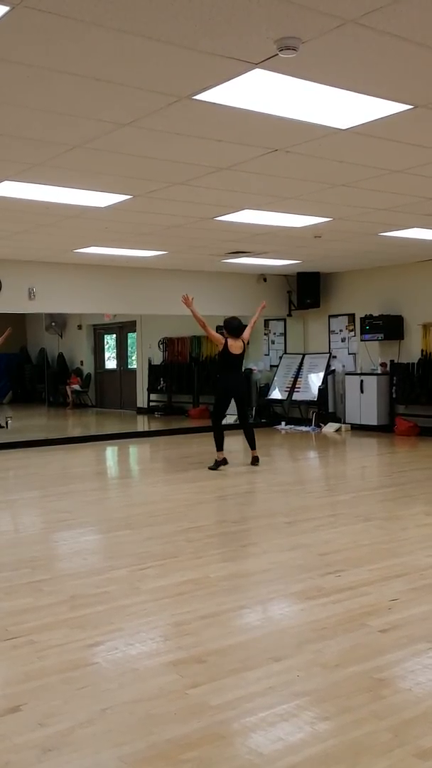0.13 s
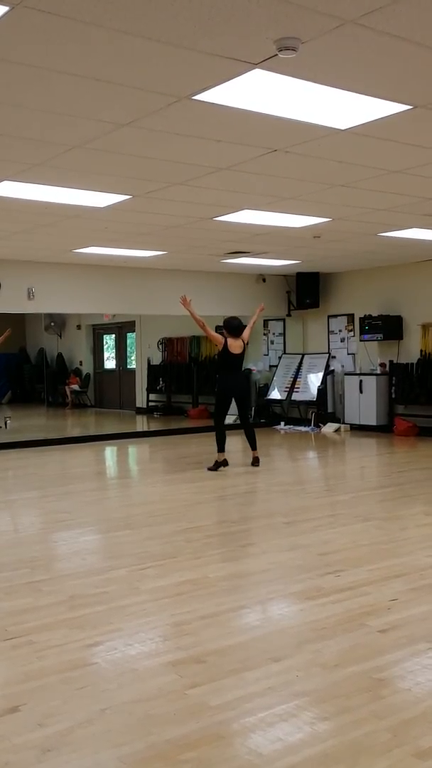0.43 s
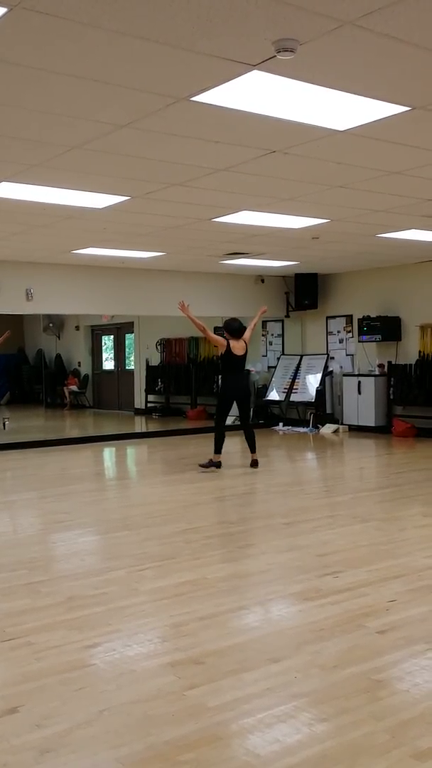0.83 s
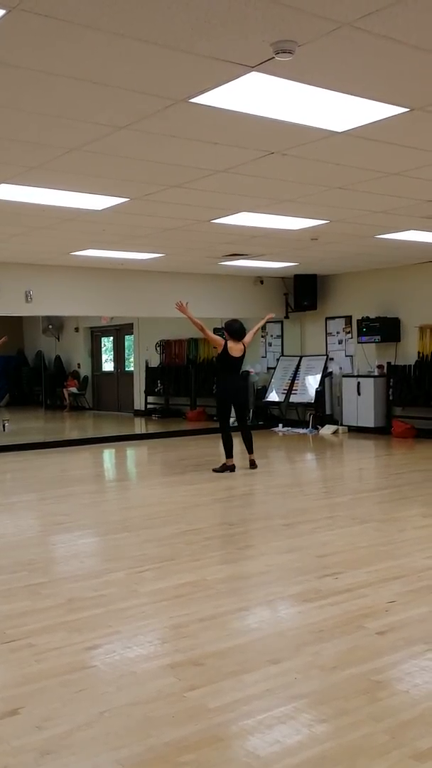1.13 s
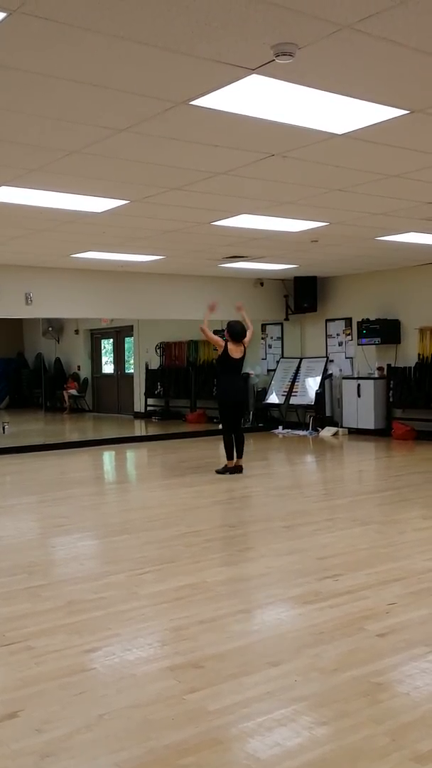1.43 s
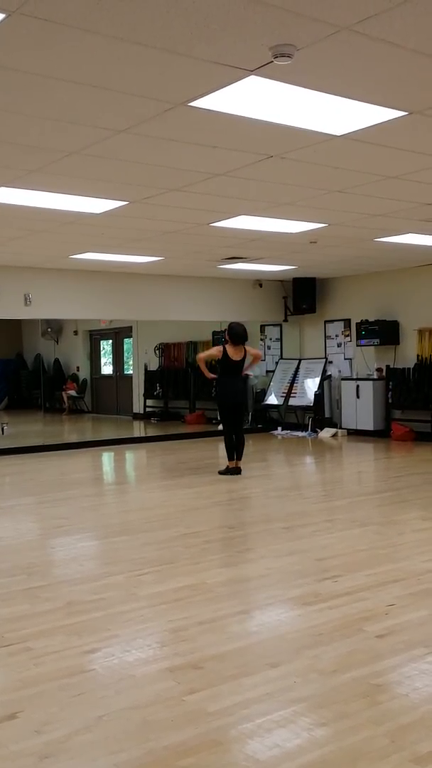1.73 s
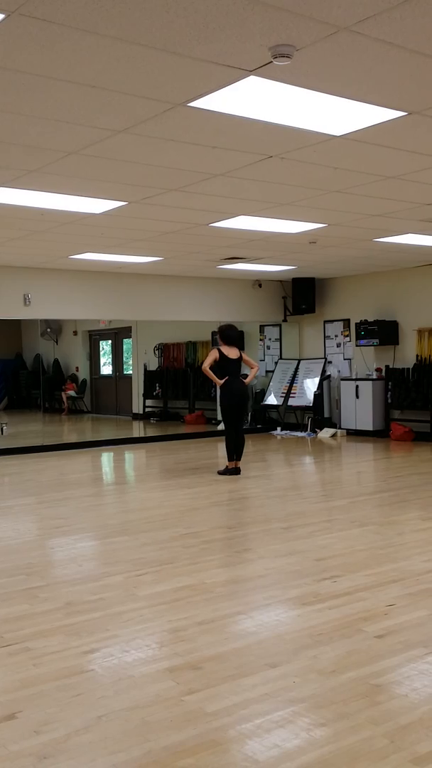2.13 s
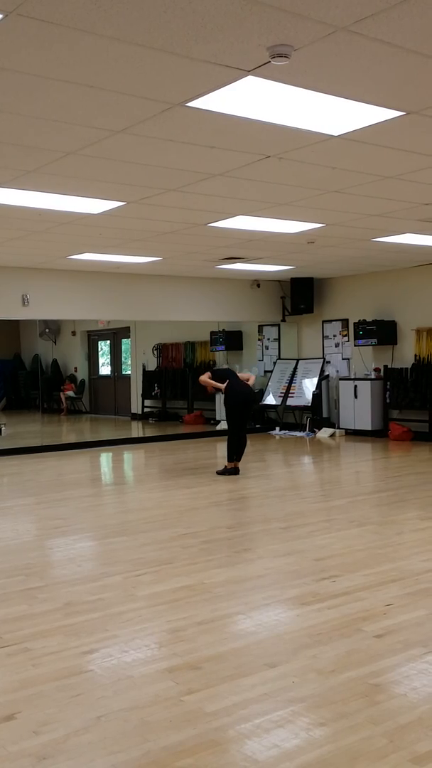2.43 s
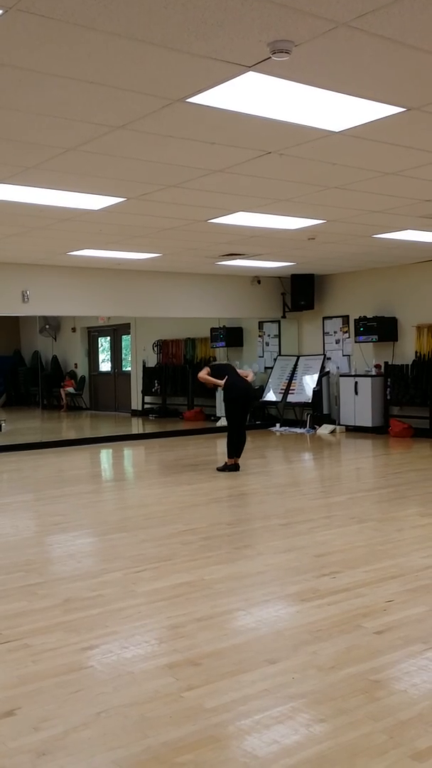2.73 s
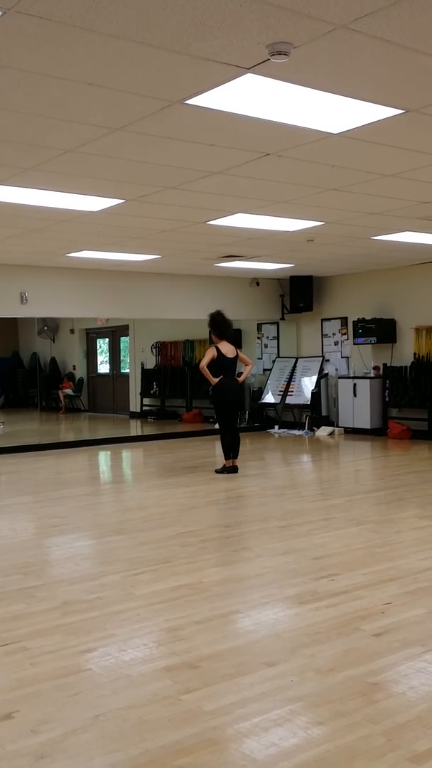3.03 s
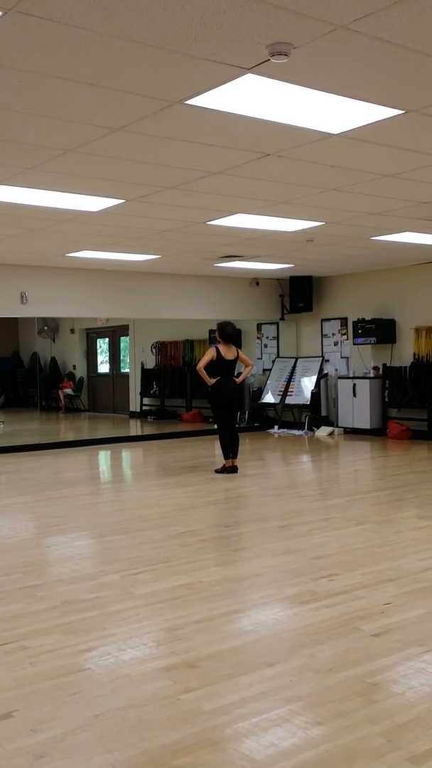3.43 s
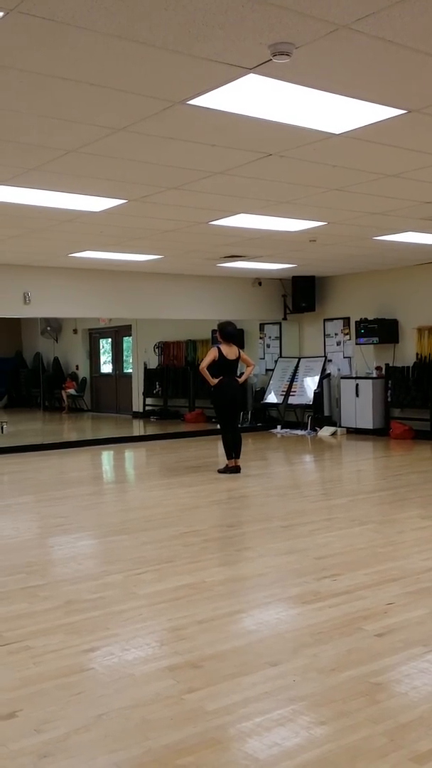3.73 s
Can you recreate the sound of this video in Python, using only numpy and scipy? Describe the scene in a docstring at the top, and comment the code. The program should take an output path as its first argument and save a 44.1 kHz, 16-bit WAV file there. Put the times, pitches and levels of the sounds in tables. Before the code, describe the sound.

Fast tap-dance strikes crack on hard boards, ring around a live room, then fade to near silence.

```python
"""First comes the ring of a tap already struck, over faint ventilation and hiss; a quick run of taps follows.
A dancer's metal-plated shoes strike a wooden floor in a live studio with a mirror wall: each blow is a
click and rattle plus room echoes, coloured as clack, plate ring and board thump. Mid-run a low drone
swells, likely a dragged sole juddering, made from multiples of its slip rate. The feet slide together
(a soft noise hiss), click lightly and settle with dull knocks, leaving ventilation and hiss."""
import sys
import numpy as np
from scipy import signal
from scipy.fft import rfft, irfft, next_fast_len
from scipy.io import wavfile
from scipy.ndimage import map_coordinates

SR = 44100
rng = np.random.default_rng(int(sys.argv[2]) if len(sys.argv) > 2 else 0)


def pcm_store(signal):
    """Save signal as 16-bit PCM."""
    levels = np.round(np.clip(np.atleast_2d(signal), -1, 1) * 32767)
    wavfile.write(sys.argv[1], SR, levels.astype(np.int16).T)


N = 176400  # length in samples: 4 s


def amp(db):
    """Decibels to gain."""
    return 10 ** (np.asarray(db) / 20)


def unit(x):
    """Scale to an average (rms) strength of 1."""
    return x / np.sqrt(np.mean(x ** 2) + 1e-20)


def along(points, hz):
    """Read a value between (f/Hz, value) points, on a log frequency axis."""
    f, value = np.transpose(points)
    return np.interp(np.log(hz + 1), np.log(f + 1), value)


def bell(x, width):
    """A smooth hump of height 1 around zero."""
    return np.exp(-.5 * (x / width) ** 2)


def octaves(hz, centre):
    """Distance from a centre frequency in octaves."""
    return np.log2((hz + 1) / centre)


def wobble(rate):
    """A smooth random curve with this many random points a second."""
    points = rng.standard_normal(int(N * rate / SR) + 4)
    return map_coordinates(points, [np.arange(N) * rate / SR])


def left_right(left, right):
    """Gains for the two channels, from dB."""
    return amp(np.array([[left], [right]]))


def add(out, s, x):
    """Mix x into out from time s, dropping what falls outside."""
    i = round(s * SR)
    x = x[:, max(-i, 0):N - i]
    out[:, max(i, 0):][:, :x.shape[1]] += x


def causal(db):
    """Turn a gain curve in dB into a filter that responds only after it is struck (minimum phase)."""
    c = irfft(np.log(amp(db)))
    n = c.shape[-1] // 2
    # fold the backward half of the log spectrum's echo onto the forward half
    c[..., 1:n] *= 2
    c[..., n + 1:] = 0
    return irfft(np.exp(rfft(c)))


def coloured(contact, db):
    """A contact sound filtered by a gain curve in dB."""
    return signal.fftconvolve(contact, causal(db)[None], axes=1)


# how alike left and right are: f/Hz, likeness (1 = identical)
LIKENESS = [(170, .98), (310, 0.5), (600, .72), (1200, 0.222), (2500, .05)]


def diffuse(size, colour=None):
    """Stereo room noise: alike in the bass, unrelated in the treble."""
    hz = np.fft.rfftfreq(size, 1 / SR)
    turn = np.arccos(np.clip(along(LIKENESS, hz), -1, 1)) / 2
    z = rfft(rng.standard_normal((2, size))) * [np.cos(turn), np.sin(turn)]
    mid, side = irfft(z * amp(along(colour, hz) if colour else 0), size)
    return unit(np.array([mid + side, mid - side]))


def burst(t60):
    """A short stereo scatter of energy 1 that fades by 60 dB in t60 seconds."""
    x = diffuse(size=2048) * amp(-60 * np.arange(2048) / SR / t60)
    return x / np.sqrt(np.sum(x ** 2) / 2)


SEAT_S = .0007  # the plate's edge takes this long to seat


def seating():
    """A tiny crunch of energy 1: each pitch of the click arrives at its own moment."""
    hz = np.fft.rfftfreq(1024, 1 / SR)
    scatter = map_coordinates(rng.standard_normal(len(hz)), [hz / 900])
    late = SEAT_S / 2 * (1 + np.tanh(scatter))
    return irfft(np.exp(-2j * np.pi * np.cumsum(late) * hz[1]))[None]


# how long the room takes to fade by 60 dB: f/Hz, t/s
ROOM_T60 = [(130, 0.62), (700, .58), (1840, 0.53), (7500, 0.53), (13000, .42)]
# first echoes from ceiling and walls: delay t/s, level/dB
FIRST_ECHOES = [(.0022, -7), (.0052, -2), (0.0201, -7.5), (0.0247, -3), (.029, -7)]
DIRECT_DB, ECHO_DB, TAIL_DB = 5, 8.5, 16.5
BUILD_S, ECHO_SPREAD_S = 0.0073, 0.014  # build-up of the tail; 60 dB fade of each echo
CHATTER_S, CHATTER_DB = 0.042, 4  # rattle on landing: 60 dB fade, level over the first click
LUMPY_DB, LUMPS_PER_S = 1.81, 97  # later echoes arrive in clumps


def studio(room_db=0):
    """One contact as heard across the room: direct click and rattle, first echoes, dense tail."""
    hz, t, z = signal.stft(diffuse(size=SR), SR, nperseg=256)
    fade = amp(-60 * t / along(ROOM_T60, hz)[:, None])
    tail = signal.istft(z * fade, SR, nperseg=256)[1][:, :SR]
    build_up = 1 - np.exp(-np.arange(SR) / SR / BUILD_S)
    tail *= build_up * amp(LUMPY_DB * wobble(LUMPS_PER_S)[:SR])
    out = amp(TAIL_DB + room_db) * unit(tail) / np.sqrt(SR)
    add(out, 0, amp(DIRECT_DB) * seating())
    add(out, 0, amp(DIRECT_DB + CHATTER_DB) * burst(CHATTER_S))
    for delay, db in FIRST_ECHOES:
        add(out, delay, amp(ECHO_DB + db + room_db) * burst(ECHO_SPREAD_S))
    return out


BOOM_HZ, BOOM_T60_S, BOOM_RISE_S, BOOM_DB = 140.2, 0.58, 0.033, -36.5  # BOOM_DB: relative to the blow


def boom():
    """The sprung floor rings on after a blow: a low tone that swells and fades."""
    t = np.arange(SR) / SR
    swell = (1 - np.exp(-t / BOOM_RISE_S)) * amp(-60 * t / BOOM_T60_S)
    return (swell * np.sin(2 * np.pi * (BOOM_HZ * t + rng.random())))[None]


# colour of a plate on wood: f/Hz, level/dB
PLATE_ON_WOOD = [(30, -23.5), (80, -15.5), (140, 6.5), (185, 9), (260, -4), (450, -5), (750, -1.5),
                 (2300, -2), (4000, -2), (6000, -4), (7500, -1), (10000, -7), (12700, -8.5), (14200, -35)]
# resonances of shoe and boards: f/Hz, width/Hz, level/dB
SHOE_MODES = [(355, 20, 4.5), (693.7, 18, 5.5), (813.6, 38, 3), (550, 35, 3)]
# their sharpest resonances: f/Hz
SHARP_LINES = [1922, 2297, 2530, 2890, 7339]
LINE_WIDTH_HZ, LINE_DB = 14, 4
# blows of the plates: t/s, level/dB, thump level/dB, wood knock level/dB, clack f/Hz, clack level/dB,
# overtone f/Hz, overtone level/dB, plate ring level/dB, ring f/Hz, sizzle level/dB,
# muted band f/Hz, muted band level/dB
BLOWS = [(-.028, -1.5, -.5, -2, 2040, 7, 3950, 6.5, 0, 7500, -2.5, 2700, -5),
         (0.1248, -8.5, 3.5, 0.5, 2000, 8.5, 4000, 4, 1, 8100, 7.5, 3020, -5),
         (0.2817, 2.5, -.5, 0, 2553, 6, 3255, 3, 4.5, 7750, -0.5, 8632, -9.5),
         (.426, -2, 3, 0.5, 2440, 11, 3307, 4.5, 2.5, 7400, 0, 5614, -6.5),
         (0.4487, -1.5, 2.5, -1, 2430, -0.5, 5000, 4.5, 3, 7250, 2, 1517, -4),
         (.5782, 3.5, -0.5, -3.5, 2340, 7, 3200, 0, 1.5, 7400, -9.5, 1395, -0.5),
         (0.7171, -7, 10.5, -2, 1860, 8, 5900, 1, -3, 7500, 6, 1250, -2),
         (.885, -5, 9.5, 7.5, 2788, 5, 5002, 6.5, 8.5, 8300, 2, 2173, -0.5),
         (1.4511, -43.5, 11.5, 8, 2500, 9.5, 4070, 8, 5, 7450, 1.5, 1650, -10),
         (1.473, -42.5, 11.5, 1, 2520, 11, 3900, 7.5, 4, 7450, -0.5, 1656, -12)]
THUMP_HZ, KNOCK_HZ, SIZZLE_HZ = 160, 810, 11500
CLACK_WIDTH_HZ, OVERTONE_WIDTH_HZ, RING_WIDTH_HZ = 340, 520, 720
MUTED_WIDTH_HZ = 290  # the spot struck leaves one band unexcited
RIPPLE_DB, RIPPLE_STEP_HZ = 3.5, 69.6  # fine resonances that shift with the spot struck
LIGHT_DB = -37  # touches lighter than this sound drier


def taps():
    """Every blow has its own mix of board thump, knock, clack and plate ring."""
    out, hz = np.zeros((2, N)), np.fft.rfftfreq(4096, 1 / SR)
    shoe = along(PLATE_ON_WOOD, hz) + sum(db * bell(hz - f, width) for f, width, db in SHOE_MODES)
    shoe += LINE_DB * sum(bell(hz - f, LINE_WIDTH_HZ) for f in SHARP_LINES)
    treble = hz ** 2 / (hz ** 2 + 1500 ** 2)  # keeps the ripple out of the bass
    for (s, db, thump, knock, clack_hz, clack, over_hz, over,
         ring, ring_hz, sizzle, muted_hz, muted) in BLOWS:
        boards = thump * bell(octaves(hz, THUMP_HZ), 0.73)
        boards += knock * bell(octaves(hz, KNOCK_HZ), 0.92)
        plate = clack * bell(hz - clack_hz, CLACK_WIDTH_HZ)
        plate += over * bell(hz - over_hz, OVERTONE_WIDTH_HZ)
        plate += ring * bell(hz - ring_hz, RING_WIDTH_HZ)
        plate += sizzle * bell(octaves(hz, SIZZLE_HZ), 0.66)
        bumps = map_coordinates(rng.standard_normal(len(hz)), [hz / RIPPLE_STEP_HZ])
        ripple = RIPPLE_DB * treble * np.tanh(bumps)
        gap = muted * bell(hz - muted_hz, MUTED_WIDTH_HZ)
        room_db = min(0, (db - LIGHT_DB) / 2)
        add(out, s, coloured(studio(room_db), db + shoe + boards + plate + ripple + gap))
        add(out, s, amp(db + thump + BOOM_DB) * boom())
    return out


# colour of ventilation and hiss: f/Hz, level/dB
AIR_COLOUR = [(20, -40), (47, -10.5), (137, -2.5), (215, -7.5), (310, -15), (380, -16.5), (1010, -25.5),
              (5520, -30.5), (7400, -15.5), (9150, -29.5), (14400, -34)]
AIR_DB, HUM_HZ, HUM_DB = -68, 324, -78.5


def air():
    """Ventilation rumble with a nearly steady fan tone, under microphone hiss."""
    phase = 2 * np.pi * HUM_HZ * np.arange(N) / SR + .5 * wobble(2.3)
    hum = unit(amp(wobble(4.4)) * np.sin(phase))
    return (amp(AIR_DB) * diffuse(N, AIR_COLOUR) + amp(HUM_DB) * hum) * left_right(1.1, -1.1)


# tones of the drone: multiple of the slip rate, level/dB
DRONE_TONES = [(4, 1), (5, -15.5), (6, -17.5), (12, -23), (18, -19)]
# boards under the dragged sole: f/Hz, level/dB
RUB_COLOUR = [(100, -32.5), (170, -3), (330, -4.5), (420, -15.5), (1000, -13.5), (2000, -39)]
DRAG_S, DRAG_END_S, DRAG_ATTACK_S, DRAG_T60_S = .457, 0.61, 0.057, .56
SLIP_HZ, DRAG_DB, RUB_DB = 51.2, -23.5, -9.5  # steady slips per second; drone; rub relative to drone
SLOW_START, SPEED_UP_S = .07, .04  # share by which the slips start slower, time constant of speeding up


def judder():
    """A sole slips faster until the rate steadies; the boards rumble and drone, mostly at four times it."""
    t = np.maximum(np.arange(N) / SR - DRAG_S, 0)
    after_end = np.maximum(t + DRAG_S - DRAG_END_S, 0)
    swell = np.minimum(t / DRAG_ATTACK_S, 1) * amp(-60 * (after_end / DRAG_T60_S) ** 1.5)
    slips = np.cumsum(SLIP_HZ * (1 - SLOW_START * np.exp(-t / SPEED_UP_S))) / SR
    tone = 0
    for multiple, db in DRONE_TONES:
        level = amp(db + 0.37 * wobble(46))
        tone = tone + level * np.sin(multiple * (2 * np.pi * slips + 0.11 * wobble(40)))
    drone = unit(tone) + amp(RUB_DB) * diffuse(N, RUB_COLOUR)
    return amp(DRAG_DB) * swell * drone * left_right(-.7, .7)


# dull knocks of heel and sole on the boards: t/s, level/dB, knock f/Hz
DULL_KNOCKS = [(.474, 2, 335), (.887, -3, 932), (1.703, -43.5, 600), (1.745, -35, 820), (2.799, -42, 520),
               (3.485, -45, 702), (3.625, -46, 700)]
# colour of a dull knock: f/Hz, level/dB
SOLE_COLOUR = [(60, -20), (300, -7.5), (1000, -11.5), (9000, -31)]
# room level of a dull knock; height and width of its resonance
STEP_ROOM_DB, STEP_PEAK_DB, STEP_OCTAVES = -6, 11.5, 0.35


def steps():
    """Heel and sole knock dully: each contact has one broad resonance and less room sound."""
    out, hz = np.zeros((2, N)), np.fft.rfftfreq(4096, 1 / SR)
    for s, db, knock_hz in DULL_KNOCKS:
        peak = STEP_PEAK_DB * bell(octaves(hz, knock_hz), STEP_OCTAVES)
        add(out, s, coloured(studio(STEP_ROOM_DB), db + along(SOLE_COLOUR, hz) + peak))
    return out


# colour of the sliding hiss: f/Hz, level/dB
SLIDE_COLOUR = [(3000, -7.5), (4300, 0.5), (5600, -7), (8500, 2.5), (11000, -10)]
SLIDE_S, SLIDE_WIDTH_S, SLIDE_DB = 1.355, .06, -65.5  # middle, bell width, level
SLIDE_PAN_DB = -5  # left over right


def slide():
    """One plate hisses softly over the varnish as the feet close: noise that swells and fades."""
    stroke = bell(np.arange(N) / SR - SLIDE_S, SLIDE_WIDTH_S)
    pan = left_right(SLIDE_PAN_DB / 2, -SLIDE_PAN_DB / 2)
    return amp(SLIDE_DB) * pan * stroke * diffuse(N, SLIDE_COLOUR)


# left, then right microphone port: peak f/Hz, width/Hz, level/dB, dip f/Hz, width/Hz, level/dB
PORT_RESONANCES = [(7158, 330, 5, 14000, 900, -5), (7960, 590, 3, 6600, 540, -3)]


def ports(x):
    """Each microphone port has its own treble resonance; the right one takes more midrange."""
    size = next_fast_len(N + SR // 2)
    hz = np.fft.rfftfreq(size, 1 / SR)
    db = np.array([up * bell(hz - peak_hz, peak_width) + down * bell(hz - dip_hz, dip_width)
                   for peak_hz, peak_width, up, dip_hz, dip_width, down in PORT_RESONANCES])
    # left minus right: f/Hz, level/dB
    tilt = along([(150, 0.4), (370, -1.5), (2300, -1.9), (4200, 1.14), (7000, -1), (12000, -1.0)], hz)
    db += np.outer([.5, -.5], tilt)
    return irfft(rfft(x, size) * amp(db), size)[:, :N]


def scene():
    """The dancer in the quiet studio."""
    return ports(taps() + steps() + slide()) + judder() + air()


TOP_HZ = 14550  # band limit


def record(dry):
    """The recorder rounds off the highest peaks and keeps nothing above its band limit."""
    held = dry / (1 + np.abs(dry / .95) ** 6) ** (1 / 6)
    size = next_fast_len(N + SR // 2)
    kept = np.fft.rfftfreq(size, 1 / SR) < TOP_HZ
    return irfft(rfft(held, size) * kept, size)[:, :N]


dry = scene()
out = record(dry)
pcm_store(out)
```